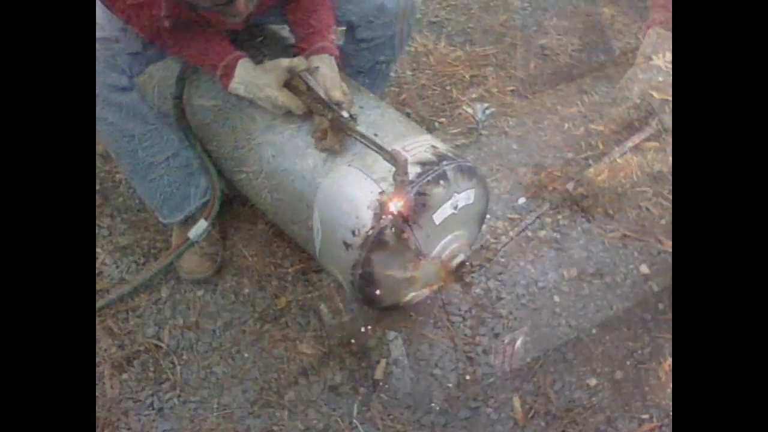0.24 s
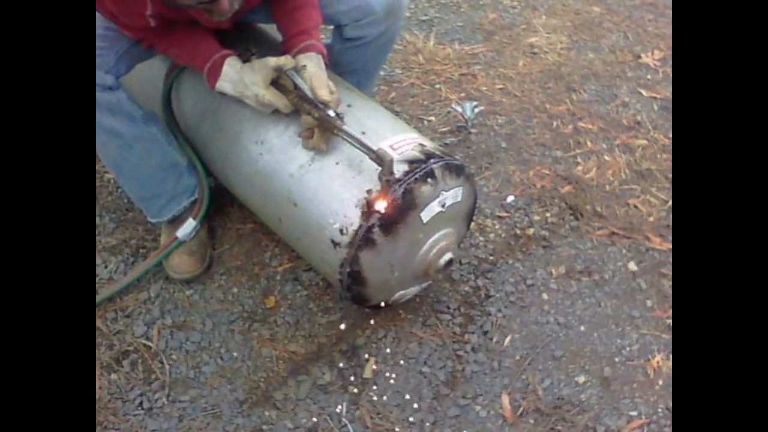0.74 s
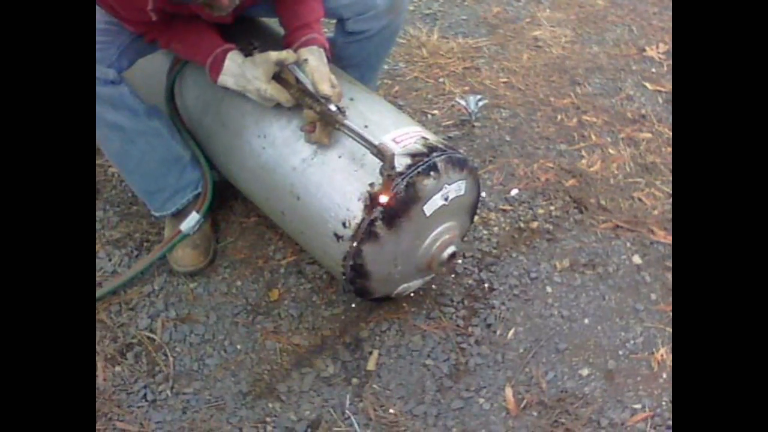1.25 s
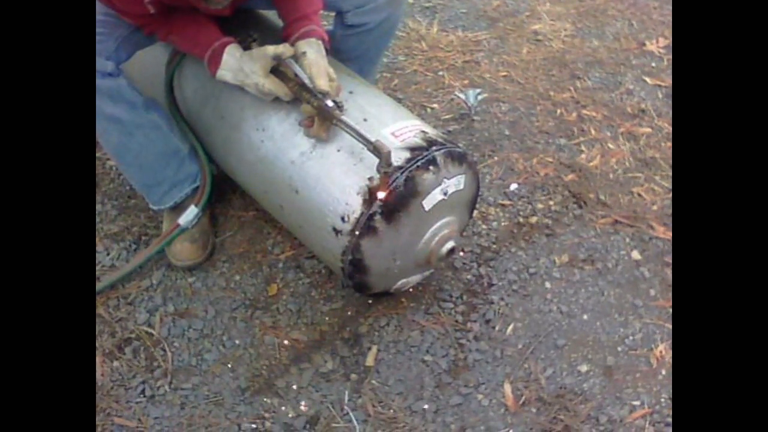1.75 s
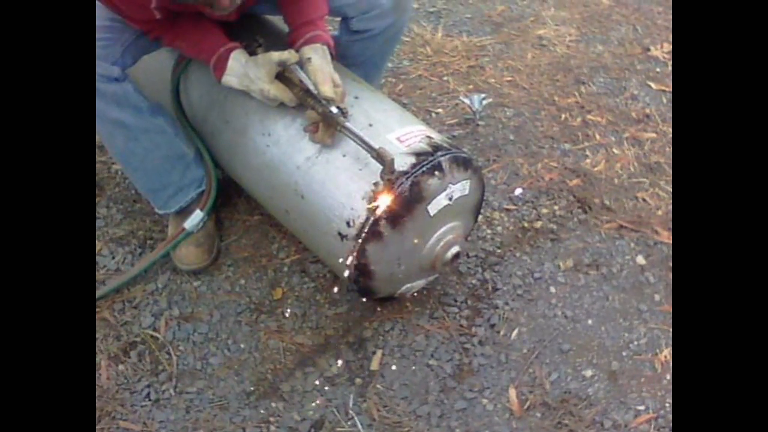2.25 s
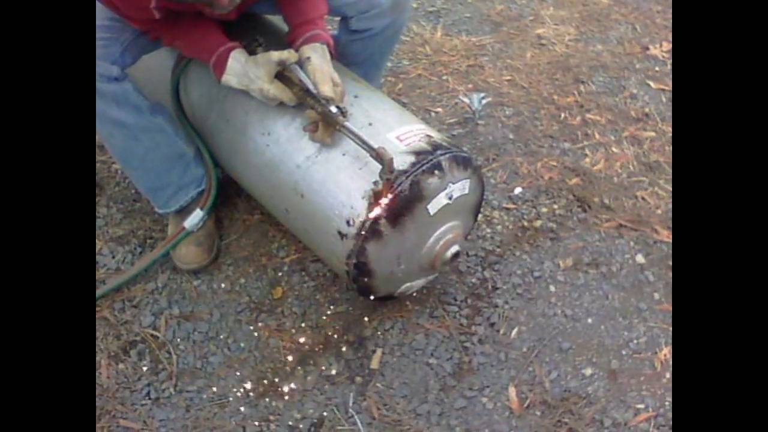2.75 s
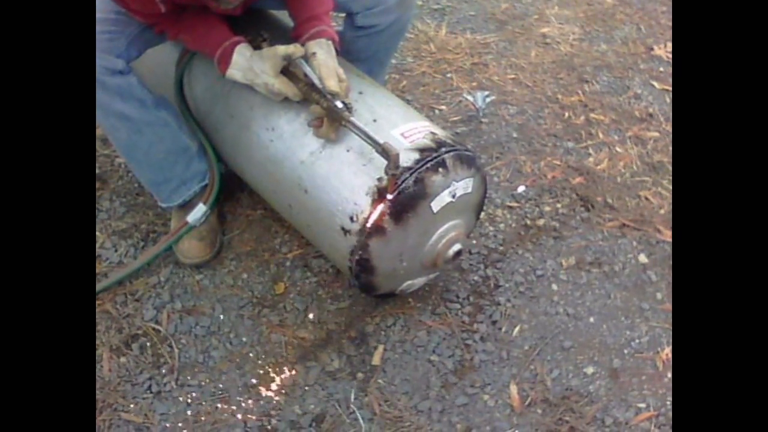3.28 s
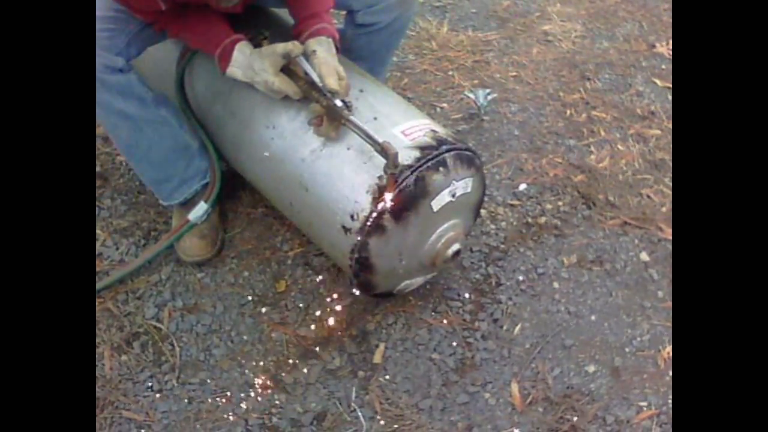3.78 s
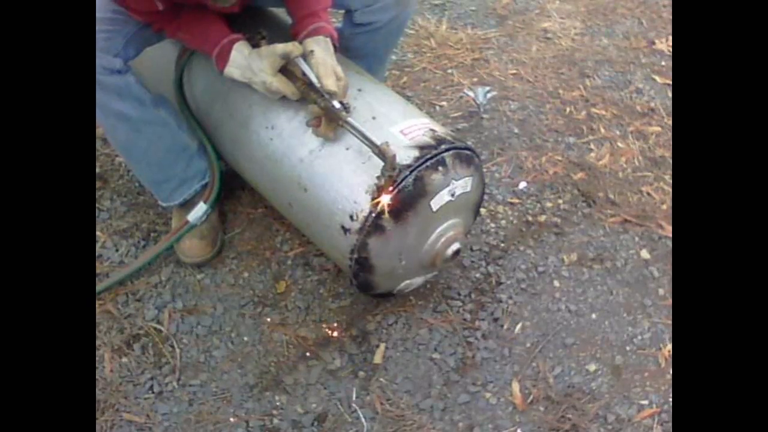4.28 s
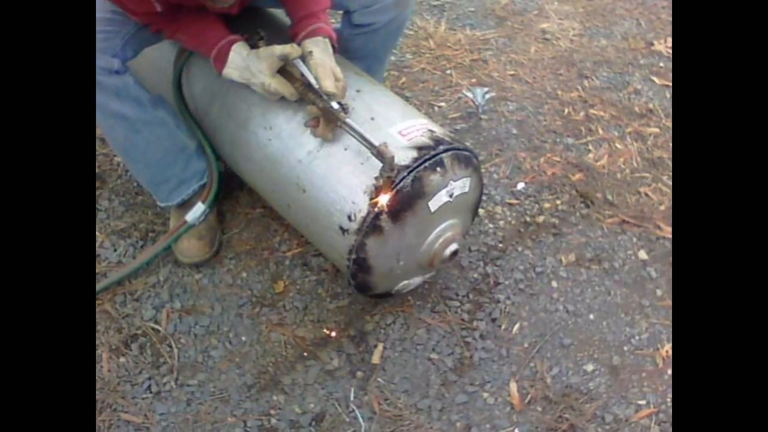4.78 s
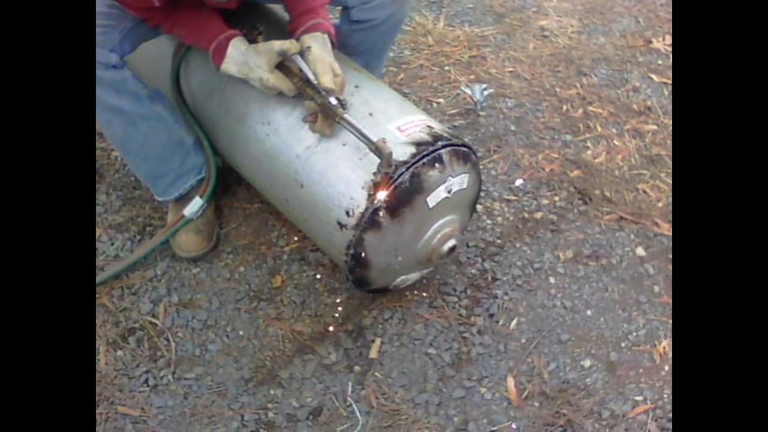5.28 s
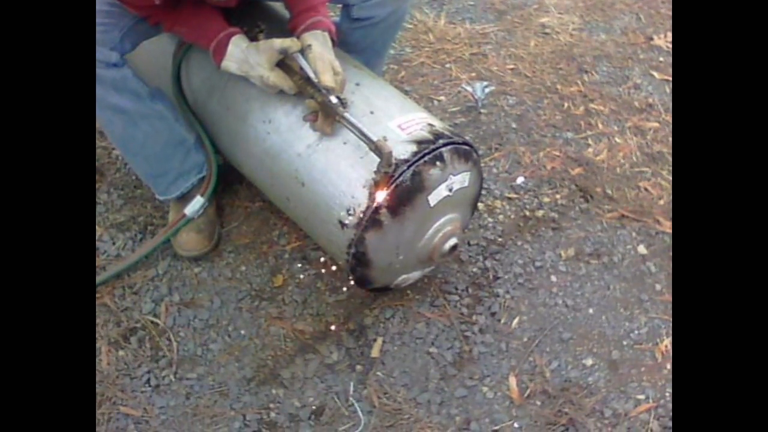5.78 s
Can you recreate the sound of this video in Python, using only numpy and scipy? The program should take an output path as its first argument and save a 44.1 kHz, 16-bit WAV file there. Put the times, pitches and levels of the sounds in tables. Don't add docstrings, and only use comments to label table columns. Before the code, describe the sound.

Gritty, overloaded gas-jet roar on ringing steel with slag spits, a one-second lull near the end, then a louder blast and dull metal thuds.

```python
import sys
import numpy as np
from scipy import signal
from scipy.fft import rfft, irfft, next_fast_len
from scipy.io import wavfile
from scipy.ndimage import uniform_filter1d, map_coordinates

SR = 44100
rng = np.random.default_rng(int(sys.argv[2]) if len(sys.argv) > 2 else 0)


def linear_from_db(decibels):
    return 10 ** (np.asarray(decibels, float) / 20)


def inscribe(sig):
    pcm = np.round(np.clip(np.atleast_2d(sig).T, -1, 1) * 32767)
    wavfile.write(sys.argv[1], SR, pcm.astype(np.int16))


N = 265834

# frequency in Hz, level in dB per Hz.
BUFFET_COLOUR = [(3, 2.5), (12, -4.5), (25, -11.5), (45, -13.5), (65, -26.5)]
# peak time in seconds, peak level in dB.
GUSTS = [(0, -30.5), (.55, -44.5), (.89, -39.5), (1.58, -43), (2.1, -41), (2.78, -29), (3.16, -32.5),
         (3.5, -36.5), (4.01, -34), (4.36, -37), (5.12, -41.5), (5.27, -33.5), (5.77, -38.5), (5.89, -30)]
GUST_RISE_S, GUST_FALL_S, BREEZE_DB = 0.053, 0.2, -45.5

# frequency in Hz, width in Hz, rms level in dB.
HUM_LINES = [(59.6, 4, -44), (69, 3.6, -46.5), (142, 3.4, -49), (220.8, 4.9, -53.5), (226.7, 7.5, -49)]

# frequency in Hz, width in Hz, level in dB.
AIR_COLUMN = [(224.1, 29.4, -1)]
# frequency in Hz, level in dB per Hz.
UPPER_AIR_COLOUR = [(220, -23.5), (250, -1), (285, -2), (330, -11), (420, -16), (520, -38.5)]
# frequency in Hz, level in dB per Hz.
RUMBLE_COLOUR = [(35, -27.5), (52, -5.5), (72, 4), (100, -5.5), (140, -7), (185, -12.5), (215, -25.5)]
# time in seconds, air column in dB, upper modes over it in dB.
BLOW = [(0, -37.5, -7), (.9, -36.5, -4.5), (1.2, -36, -3.5), (2.2, -36, -1.5), (2.35, -37.5, -11.5),
        (3.4, -37, -7), (3.9, -41, -7), (4.06, -49.5, -9), (4.77, -54.5, -5), (5.02, -35, -1),
        (5.2, -28, 0), (5.4, -32, 3.5), (5.85, -30, 0.5), (6.03, -18.5, -5.5)]
# middle in seconds, half length in seconds, column in dB, rumble in dB.
LURCHES = [(.08, 0.029, -16, -5), (.37, 0.025, 9, -3), (.48, .04, 13.5, 2), (.92, .08, -1, -5),
           (1.14, 0.067, 4, 1), (1.24, 0.034, -13, 0), (1.36, 0.027, 7.5, 3), (1.56, 0.067, 6.5, 4.5),
           (1.87, 0.041, 8, 3.5), (2.37, .03, 0.5, 0), (2.47, .03, 5, -11.5), (2.62, 0.014, 6, -2.5),
           (2.84, 0.046, 3.5, -3), (2.91, 0.02, -1.5, 7), (3.22, 0.024, 7, 3.5), (3.4, 0.025, -3, 1),
           (3.61, .04, 8, 5), (5.22, 0.09, 6.5, 5.5), (5.34, .05, -2.5, -0.5), (5.13, .03, -3.5, 5),
           (5.45, .04, -3, 9), (5.57, .05, 0, 1.5), (5.9, .05, -2, 7.5)]
RUMBLE_DB, RUMBLE_REST_DB, WAVER_DB = -1.5, -46.5, 3

# frequency in Hz, level in dB per Hz.
PREHEAT_COLOUR = [(200, -22.5), (280, 1.5), (800, 3), (1100, 0), (2400, -6), (3800, -6.5), (5000, -12.5),
                  (5700, -6.5)]
PREHEAT_DB = -42.5
# middle in seconds, half length in seconds, level in dB.
SWELLS = [
    (4.29, .045, -46),
    (4.362, 0.028, -36),
    (4.43, .035, -44),
    (4.62, .05, -43),
]

# start in seconds, peak in dB, frequency in Hz, T60 in seconds.
THUMPS = [
    (5.89, -2, 63.4, 0.059),
    (5.941, -8, 101, 0.065),
    (5.9643, 1, 149.5, .05),
    (5.9655, -1, 331, 0.036),
    (5.981, -4.5, 133.7, 0.085),
]

# middle in seconds, level in dB, frequency in Hz, length in seconds.
CHIRPS = [
    (4.886, -19.5, 3400, 0.013),
    (4.928, -16.5, 2650, 0.029),
    (4.957, -18.5, 2200, 0.022),
    (5.035, -24, 1400, .05),
    (2.965, -17, 1250, 0.032),
    (2.06, -29, 1270, 0.056),
    (1.5, -30.5, 1600, 0.029),
    (2.1, -45, 880, .03),
]

# start in seconds, burst in dB, T60 in seconds, snap in dB.
SPITS = [
    (.99, -7, .012, -30),
    (2.954, -12, 0.018, -30),
    (3.907, -14, 0.034, -33),
    (4.487, -30, .02, -45),
    (4.623, -22.5, .004, -7),
    (4.881, -16, .03, -32),
]

# frequency in Hz, level in dB per Hz.
HISS_COLOUR = [(1000, -49.5), (1700, -18.5), (1880, -10), (2110, -12.5), (2480, -3), (2700, -6.5),
               (3100, -3), (3400, -6), (3790, -2), (5010, -3), (5260, -1.5), (5500, 0.5), (7150, -41.5),
               (12100, -120)]
# frequency in Hz, level in dB per Hz.
ROAR_COLOUR = [(600, -33.5), (700, -10.5), (800, -10), (1020, -5.5), (1200, 5), (1700, -4), (1950, 3),
               (2200, -7.5), (2500, -17.5)]
# frequency in Hz, level in dB per Hz.
GROWL_COLOUR = [(290, -33.5), (345, -6.5), (390, 0), (560, -0.5), (680, -4), (800, -27.5)]
# frequency in Hz, width in Hz, level in dB.
SHELL_MODES = [(658, 7.8, 8), (745.4, 11.8, 10), (866, 6.5, 10.5), (985, 11, 4), (1174, 40, -4.5),
               (1299, 24, 4), (1428, 14, 4), (1543, 16, 5), (1630, 37, -4.5)]
# time in seconds, hiss in dB, roar over the hiss in dB (depth in the cut).
FLOW = [(0, -28.5, -8.5), (.2, -26, -9.5), (.8, -24.5, -12.5), (1.2, -23, -14), (1.9, -23, -11.5),
        (2.3, -24, -11.5), (2.56, -24.5, -8), (2.63, -22, -5.5), (3.1, -19, -8), (3.4, -18, -7.5),
        (3.56, -16.5, -13), (3.62, -10.5, -14.5), (3.86, -18.5, -11.5), (4.9, -22.5, -8.5),
        (5.08, -19, -14.5), (5.2, -15, -11), (5.65, -16, -15), (6.03, -12.5, -13.5)]
# middle in seconds, half length in seconds, hiss in dB,
# roar over it in dB.
FLARES = [(.48, 0.12, 4.5, -1), (.66, .04, 4, -2.5), (.99, .015, 3.5, 1.5), (1.6, 0.016, 2, 2.5),
          (2.05, 0.062, 1.5, 2), (2.65, 0.023, 4, -3), (2.76, 0.034, 0.5, -3.5), (2.965, 0.026, 3.5, -2),
          (3.19, .03, -0.5, -0.5), (3.25, 0.022, 1, 2), (3.35, 0.06, -2, -7), (3.48, 0.024, -1, 1.5),
          (3.79, 0.025, 1.5, -1), (3.88, 0.02, -5.5, 1), (4.886, 0.0058, 7.5, -4), (5.15, 0.04, -1.5, -2),
          (5.4, 0.048, -1.5, 0.5), (5.62, .05, 2, 0), (5.82, .04, 1.5, 1), (5.96, .02, 0, 0.5)]
GROWL_DB, GROWL_SWAY_DB, ROAR_SWAY_DB = -5.5, 0.96, 1.06
LET_GO_S, PRESS_S, OPEN_S, OPEN_CURVE = 3.92, 4.77, 0.13, 1.75
SHUT_T60, LINGER_DB, LINGER_T60 = 0.17, -10.5, 0.58
LOW_LINGERS = 1.6

# frequency in Hz, level in dB.
SMOOTHING = [(0, 0), (5100, 0), (5300, -6), (5500, -17.5), (5700, -35), (5800, -100)]
# time in seconds, peak in dB.
TICKS = [
    (0.4628, -47),
    (0.6649, -36),
    (2.9555, -38),
    (3.2198, -43),
    (3.257, -27),
]
SLOW = 4


def unit(x):
    return x / np.sqrt(np.mean(x ** 2) + 1e-20)


def curves(rows):
    s, *cols = np.transpose(rows)
    return [np.interp(np.arange(N) / SR, s, c) for c in cols]


def bumps(rows):
    s, half, *cols = np.transpose(rows)
    knots = np.arange(0, N + 64, 64)
    bells = np.exp(-((knots / SR - s[:, None]) / half[:, None]) ** 2)
    return [np.interp(np.arange(N), knots, c @ bells) for c in cols]


def wobble(rate):
    return map_coordinates(rng.standard_normal(N // 100), [np.arange(N) * rate / SR])


def filtered(x, response):
    m = next_fast_len(N + SR // 2)
    return irfft(rfft(x, m) * response(np.fft.rfftfreq(m, 1 / SR)), m)[:N]


def colour(points):
    f, db = np.transpose(points)
    return lambda hz: linear_from_db(np.interp(np.log(hz + 1), np.log(f + 1), db, left=-120, right=-120))


def modes(table):
    def response(f):
        total = 0
        for k, (centre, width, db) in enumerate(table):
            damping = 1j * f * width
            total = total + (-1) ** k * linear_from_db(db) * damping / (centre * centre - f * f + damping)
        return total
    return response


def patchy(x, depth_db, count, frames, size):
    z = signal.stft(x, nperseg=size)[2]
    field = uniform_filter1d(rng.standard_normal(z.shape), size=count, axis=0)
    field = uniform_filter1d(field, size=frames, axis=1)
    return signal.istft(z * linear_from_db(depth_db * unit(field)), nperseg=size)[1][:N]


def turbulence(patchy_db, count, response):
    noise = patchy(rng.standard_normal(N), patchy_db, count, frames=12, size=512)
    return unit(filtered(noise, response))


def hum():
    out = np.zeros(N)
    for hz, width, db in HUM_LINES:
        line = filtered(rng.standard_normal(N), lambda f: 1 / (1 + ((f - hz) / width) ** 2))
        out += linear_from_db(db) * unit(line)
    return out


def wind():
    t = np.arange(N) / SR
    strength = linear_from_db(BREEZE_DB)
    for s, db in GUSTS:
        strength = strength + linear_from_db(db) * np.exp(np.minimum((t - s) / GUST_RISE_S, (s - t) / GUST_FALL_S))
    return linear_from_db(1.5) * strength * unit(filtered(rng.standard_normal(N), colour(BUFFET_COLOUR)))


def hollow():
    blow_db, upper_db = curves(BLOW)
    boom_db, lurch_db = bumps(LURCHES)
    column_db = blow_db + boom_db + WAVER_DB * wobble(14)
    column_mode = modes(AIR_COLUMN)
    column = turbulence(0.0, 1, lambda f: column_mode(f) ** 2)
    upper = turbulence(2.0, 1, colour(UPPER_AIR_COLOUR))
    rumble = turbulence(1.5, 1, colour(RUMBLE_COLOUR))
    rumble_gain = linear_from_db(lurch_db) * (linear_from_db(blow_db + RUMBLE_DB) + linear_from_db(RUMBLE_REST_DB))
    return linear_from_db(column_db) * column + linear_from_db(blow_db + upper_db) * upper + rumble_gain * rumble


def preheat():
    swell, = bumps([(s, half, linear_from_db(db)) for s, half, db in SWELLS])
    phase = 2 * np.pi * 992 * np.arange(N) / SR + 0.6 * wobble(45)
    singing = swell * linear_from_db(-5.0 + 1.3 * wobble(40)) * np.sqrt(2) * np.sin(phase)
    flame = turbulence(0.5, 4, colour(PREHEAT_COLOUR))
    return singing + linear_from_db(PREHEAT_DB - 1.0) * flame


def thumps():
    out, t = np.zeros(N + SR), np.arange(SR // 3) / SR
    for s, db, hz, t60 in THUMPS:
        envelope = linear_from_db(db - 60 * t / t60) * (1 - np.exp(-t / 0.0022))
        out[round(s * SR):][:len(t)] -= envelope * np.sin(2 * np.pi * hz * t)
    return out[:N]


def chirps():
    t, waver = np.arange(N) / SR, 1.6 * wobble(400)
    out = np.zeros(N)
    for s, db, hz, length in CHIRPS:
        out += linear_from_db(db - 42 * ((t - s) / length) ** 2) * np.sin(2 * np.pi * hz * t + waver)
    return out


def spits():
    out, t = np.zeros(N + SR), np.arange(SR // 10) / SR
    for s, db, t60, snap_db in SPITS:
        start = round(s * SR)
        out[start:][:len(t)] += linear_from_db(db - 60 * t / t60) * rng.standard_normal(len(t))
        out[start] -= linear_from_db(snap_db)
    return filtered(out[:N], modes([(3600, 4100, 0.0041)]))


def lever(longer):
    t = np.arange(N) / SR
    since = np.clip(t - LET_GO_S, 0, None)
    shutting = linear_from_db(-60 * since / SHUT_T60)
    lingering = linear_from_db(LINGER_DB - 60 * since / (longer * LINGER_T60))
    opening = np.clip((t - PRESS_S) / OPEN_S, 0, 1) ** OPEN_CURVE
    return np.where(t < PRESS_S, np.maximum(shutting, lingering), opening)


def dense_modes(x, depth_db):
    return patchy(x, depth_db, count=2, frames=16, size=2048)


def jet():
    hiss_db, depth_db = np.add(curves(FLOW), bumps(FLARES))
    roar_db = depth_db + ROAR_SWAY_DB * wobble(9)
    growl_db = depth_db + GROWL_DB + GROWL_SWAY_DB * wobble(11)
    sputter_db = 0.22 * wobble(14) + 0.49 * wobble(45)
    hiss = linear_from_db(1.26 + sputter_db) * turbulence(1.5, 2, colour(HISS_COLOUR))
    roar = linear_from_db(roar_db - 0.5 + sputter_db) * turbulence(1.5, 4, colour(ROAR_COLOUR))
    growl = linear_from_db(growl_db - 2.0 + sputter_db) * turbulence(2.0, 2, colour(GROWL_COLOUR))
    ring = linear_from_db((roar_db + growl_db) / 2 - 2.5) * turbulence(2.5, 1, modes(SHELL_MODES))
    low_gain = lever(LOW_LINGERS)
    bright = dense_modes(lever(0.79) * hiss + low_gain * roar, depth_db=2.0)
    return linear_from_db(hiss_db) * (bright + low_gain * (growl + ring))


def scene():
    background = hum() + wind() + hollow()
    return (background + preheat() + thumps() + chirps() + spits() + jet())[None]


def band_limit(x):
    return signal.sosfilt(signal.butter(12, 15800, fs=SR, output="sos"), x)


def record(dry):
    slow = signal.resample_poly(dry[0], 1, SLOW) - 0.035
    slow = np.clip(slow, -0.48, 0.48)
    held = np.zeros(N)
    held[::SLOW] = SLOW * slow[:len(held[::SLOW])]
    smooth = np.clip(filtered(held, colour(SMOOTHING)), -0.511, 0.511)
    for s, db in TICKS:
        smooth[round(s * SR)] += linear_from_db(db + 6.5)
    return band_limit(smooth[None])


dry = scene()
out = record(dry)
inscribe(out)
```